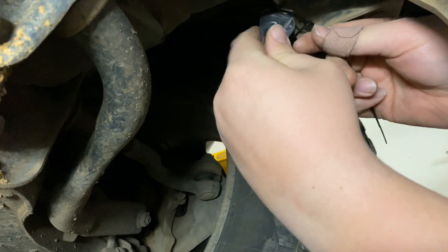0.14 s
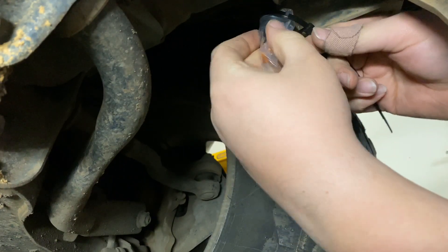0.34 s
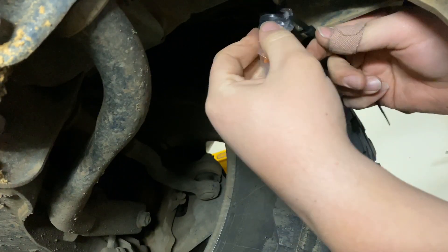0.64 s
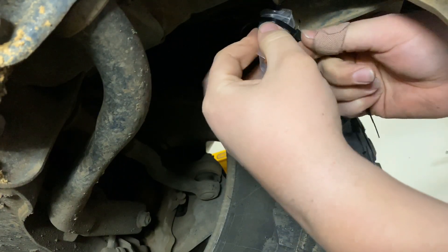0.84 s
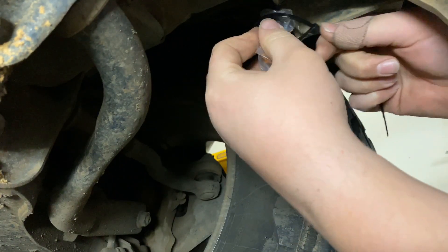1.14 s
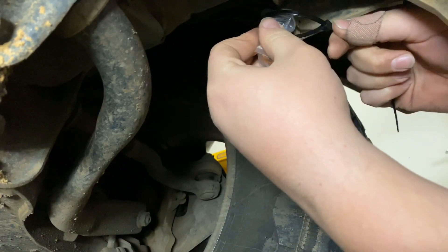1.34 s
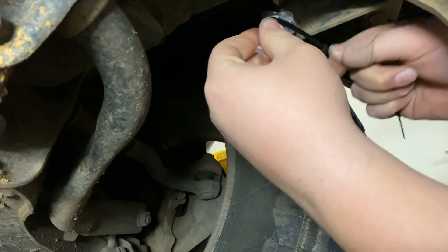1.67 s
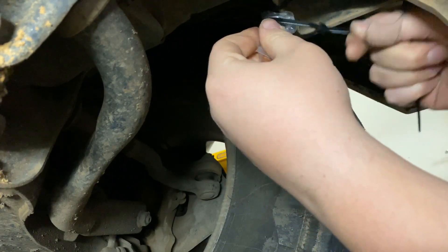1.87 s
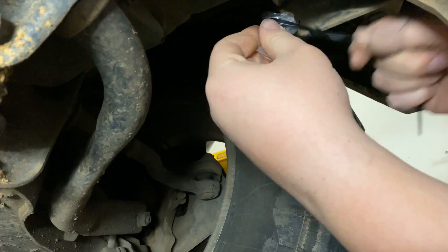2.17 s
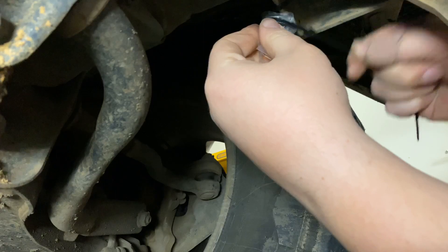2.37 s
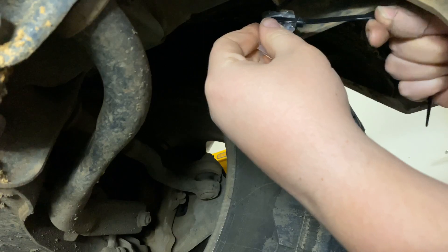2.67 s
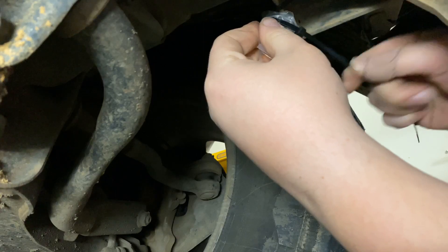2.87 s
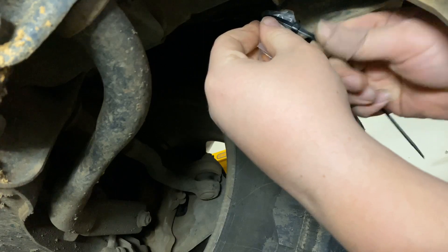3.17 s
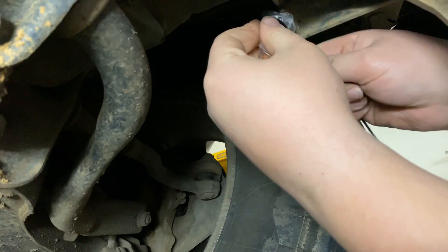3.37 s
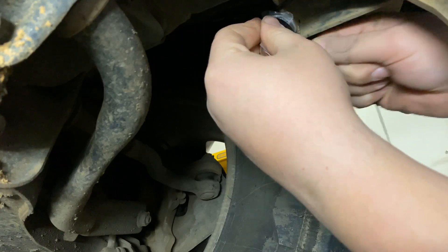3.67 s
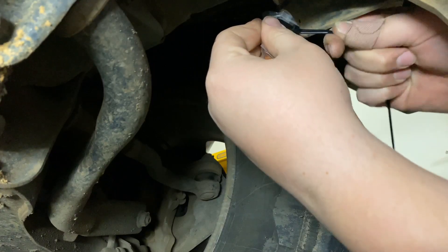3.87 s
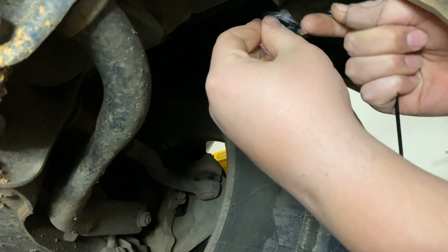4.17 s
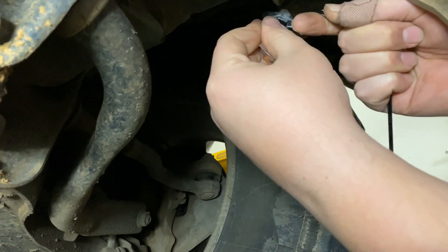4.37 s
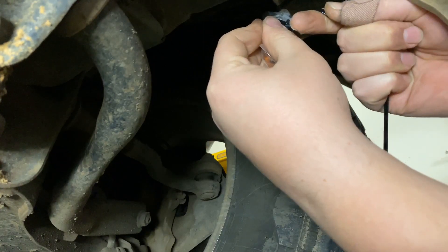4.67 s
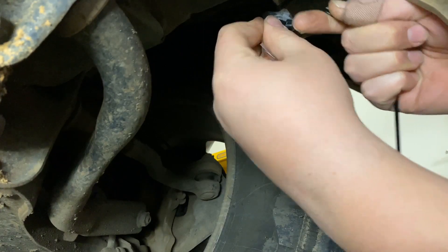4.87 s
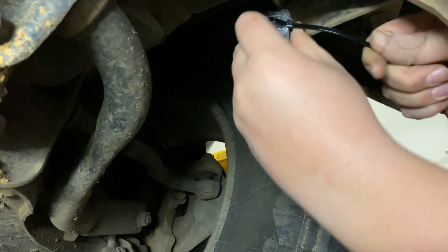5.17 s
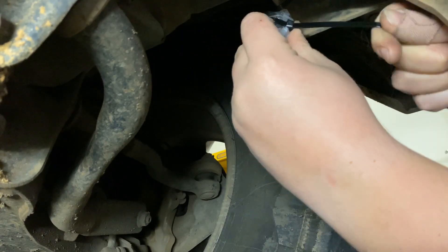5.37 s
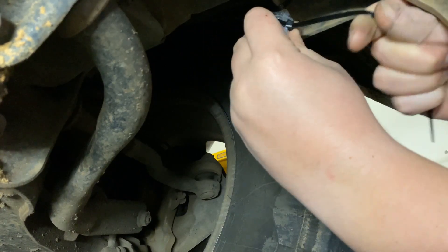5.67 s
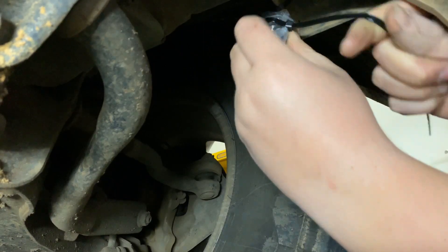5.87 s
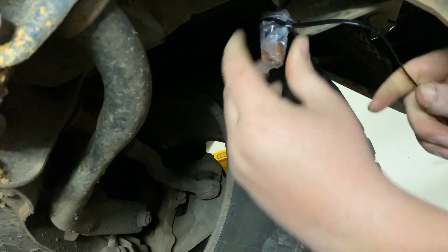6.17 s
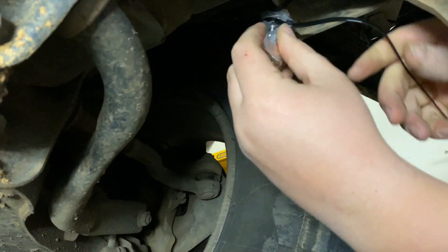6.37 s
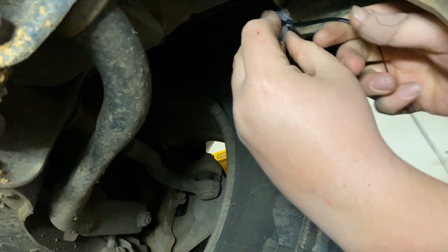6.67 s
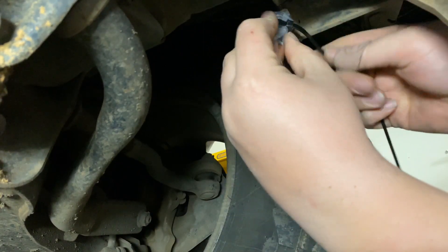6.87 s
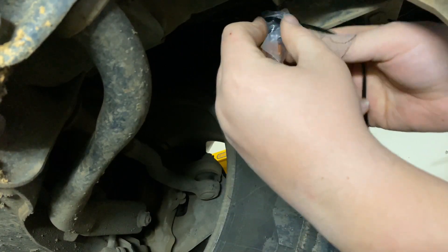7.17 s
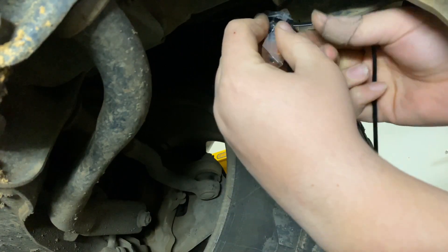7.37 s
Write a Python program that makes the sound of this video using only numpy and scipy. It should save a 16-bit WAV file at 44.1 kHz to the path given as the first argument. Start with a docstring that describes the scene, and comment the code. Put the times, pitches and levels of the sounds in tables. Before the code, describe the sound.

Very close to the microphone, hands rustle and snap a thin plastic bag. Three very short ratchet zips of a nylon tie follow within a second, each leaving a faint metallic ring, then a stronger zip later. Sharp clicks and crinkles continue, with a tiny strap squeak and firmer rustling toward the end. A garage tail, soft air hiss and a low distant engine hum lie underneath.

```python
"""Hands pull a nylon cable tie tight around a plastic bag under a car, close to the microphone.
From the start the bag rustles and snaps: shaped noise for sliding skin, short coloured clicks for the snaps.
Four quick pulls follow, each a run of clicks as the pawl rattles over the teeth; a metal part rings faintly.
Later the strap squeaks briefly in bands of noise, and snaps and strokes go on to the end.
Throughout, echoing noise makes the garage answer, two wavering tones hum as a far engine, and the air hisses."""
import sys
import numpy as np
from scipy import signal
from scipy.fft import rfft, irfft
from scipy.io import wavfile
from scipy.ndimage import uniform_filter1d

SR = 44100
rng = np.random.default_rng(int(sys.argv[2]) if len(sys.argv) > 2 else 0)


def wrap_up_sound(samples):
    """Save the sound to the file named by the first command line argument, as 16-bit audio."""
    columns = np.atleast_2d(samples).T
    # keep every value between -1 and 1, then stretch to whole-number steps
    tamed = np.clip(columns, -1, 1)
    steps = np.round(tamed * 32767).astype(np.int16)
    wavfile.write(sys.argv[1], SR, steps)


N = 331181
TIME = np.arange(N) / SR
BINS = np.fft.rfftfreq(4096, 1 / SR)  # frequencies at which a click is coloured [Hz]

# fingers sliding on bag and strap, levels before the overall rub and fizz settings:
# (start [s], length [s], hardest moment [0-1], rub level [dB], fizz level [dB])
STROKES = [(0, 0.24, 0, -54.5, -57), (.2, 0.39, 0.2, -62, -72.5), (.53, 0.31, 0.15, -60.5, -66.5),
           (1.136, 0.068, 0.35, -49, -49), (1.572, 0.088, 0.9, -75, -60.5), (1.904, 0.12, 0.04, -68, -51),
           (2.318, 0.18, 0.97, -65, -53), (2.744, 0.38, 0.04, -67.5, -66.5),
           (3.16, 0.19, 0.33, -58.5, -60.5), (4.839, .24, 0.42, -49, -56), (5.042, 0.26, 0.16, -66, -65.5),
           (5.612, 0.32, 0.55, -62.5, -62.5), (5.813, 0.21, 0.32, -46, -62.5),
           (6.156, 0.17, 0.13, -54.5, -59), (6.322, 0.14, 0.18, -56, -57.5), (6.469, 0.11, 0.46, -54, -54),
           (6.61, 0.43, 0.13, -54.5, -65), (6.988, .34, 0.78, -50.5, -61), (7.346, 0.078, 0.7, -69, -57.5)]


def pulls(level_db, shake_db):
    """Every tooth flicks the pawl, in most pulls duller as it goes on; the strap rings and shakes the metal."""
    # timing of the quick pulls: (start [s], length [s], pause before the last slip [s], teeth [count],
    # fastest moment [0-1], slowing at the ends [ratio])
    pull_motions = [(1.7495, .0894, .0136, 13, .56, 3), (2.1107, .0689, .0274, 14, .48, 2.8),
                    (2.511, .0326, .0198, 9, .02, .7), (3.6278, .0855, .0198, 11, .4, 1.8)]
    # force of each pull: (level [dB], swell in the middle [dB], fade [dB], shaking of the metal part [dB],
    # share of clean snap in a tooth [0-1], darkening from first to last tooth [dB per octave])
    pull_forces = [(2.5, 0, 4, 4, 0, 3), (1.46, 0.8, -1, 7.5, 0.32, 1.5), (5, 0.5, -1, 6, 0.2, 0),
                   (9.5, 7, 7, -18.5, .05, 3.5)]
    # colour of each pull, which changes as the loop shrinks; one list a pull: (frequency [Hz], level [dB per Hz])
    pull_colours = [
        [(71, -37), (120, -7), (284, -17), (427, -7), (524, -13), (580, -6), (822, -20), (1320, -4),
         (2150, -3.5), (3110, -11), (4410, -10), (4780, -16), (9400, -6), (13900, -4), (16000, -8)],
        [(71, -44), (120, -14), (184, -10), (284, -21), (580, -2), (712, -17), (968, -16), (1320, -9),
         (1830, -9), (2650, -2), (3450, -16), (3740, -11), (5300, -16), (11500, -5), (16000, -13)],
        [(71, -50), (120, -20), (289, -24), (569, -2), (698, -13), (1320, -10), (1430, -13), (2430, -3),
         (3110, -12), (3740, -8), (4500, -13), (6370, -4), (9210, -12), (12000, -4), (16000, -13)],
        [(71, -45), (120, -15), (308, -18), (617, -14), (684, -19), (757, -17), (1320, -3), (1860, -7),
         (2700, -2), (3110, -12), (5190, -6), (5630, -11), (8660, -7), (9990, -17), (16000, -13)],
    ]
    # narrow resonances of the strap and what it grips: (frequency [Hz], width [Hz], lift [dB])
    strap_rings = [(1340, 110, 5), (2370, 200, 1), (2760, 150, 4), (3830, 150, 3), (5060, 150, 3),
                   (8720, 200, 3), (12150, 250, 3)]
    # the ringing metal part: (frequency [Hz], level before shaking [dB], time to fall by 60 dB [s])
    metal_rings = [(614, -64, 1.4), (598, -68, .6), (824, -73, .5), (335, -66, .3)]
    tooth_tilt_db = 0.66  # chance difference in brightness between teeth, per octave

    out, shaking = np.zeros(N), np.zeros(N)
    t = np.arange(2 * SR) / SR
    strap_db = sum(db / (1 + (2 * (BINS - hz) / width) ** 2) for hz, width, db in strap_rings)
    metal = sum(amp(db - 60 * t / t60) * np.sin(2 * np.pi * hz * t) for hz, db, t60 in metal_rings)
    octaves = np.log2(BINS + 500)

    for motion, force, colour in zip(pull_motions, pull_forces, pull_colours):
        *loudness, shake, clean, darkening = force
        run = teeth(*motion, *loudness)
        colour_db = read(colour, BINS) + strap_db
        for (s, db), progress in zip(run, np.linspace(-.5, .5, len(run))):
            tilt = tooth_tilt_db * rng.standard_normal() - darkening * progress
            gain = evened(amp(colour_db + tilt * octaves))
            tooth = click(gain, rattle_s=.0014, clean=clean, arch_db=-9, arch_t60=.052)
            add(out, s, amp(level_db + db) * tooth)
        add(shaking, run[:, 0].mean(), amp(shake_db + shake) * metal)
    return out, shaking


def teeth(start, length, pause, count, fastest, slowing, level_db, swell_db, fade_db):
    """The hand speeds up, then brakes; after a pause one last tooth slips. Gives (s, dB) for each tooth."""
    slip_db = -1.6  # the last slip is weaker
    jitter_s, spread_db = .0002, 0.56  # no two teeth are quite alike
    along = np.linspace(0, 1, round(count))
    gaps = 1 + slowing * (np.linspace(0, 1, len(along) - 1) - fastest) ** 2
    times = start + length * np.r_[0, np.cumsum(gaps)] / gaps.sum()
    db = level_db - swell_db * (2 * along - 1) ** 2 - fade_db * (along - .5)
    times = np.r_[times, times[-1] + pause]
    db = np.r_[db, db[-1] + slip_db]
    chance = rng.standard_normal((len(times), 2)) * [jitter_s, spread_db]
    return np.c_[times, db] + chance


def snaps(level_db, thud_db):
    """Each snap has its own ring, over the knock and body of the bundle and a bright crack."""
    # the clear snaps of pawl, strap and bag, levels before the overall setting:
    # (time [s], ring [Hz], ring level [dB], knock level [dB], body level [dB], crack level [dB])
    snap_events = [(.04, 4990, -2, 1.5, -3, -25), (0.1031, 5470, -4, 0, 1.5, -34),
                   (0.259, 4560, -10.5, -0.5, 3, -46), (.3343, 4910, 1, 10, 2.5, -40),
                   (.384, 4570, -7.5, -27, -9, -16.5), (.443, 4800, -9, -15, -9.5, -21.5),
                   (0.5498, 3820, -7, -3.5, -9, -14), (0.5646, 7300, 1, -14, 6, -24),
                   (.591, 4560, 8.5, -20, 6.5, -21), (.607, 4800, 5, 2, 6, -10),
                   (.6579, 2880, 5, 4.5, -12, -45), (0.811, 5040, -15.5, -14, -17, -32),
                   (1.1673, 6100, 3.5, 0, -1, -24), (1.1754, 3180, 3, -20, -15, -30),
                   (1.3367, 3500, -2, -36, -10, -15), (1.3813, 3480, 7, -8.5, 0, -17),
                   (1.5989, 3480, 0.5, -5, 4, -37), (1.616, 4360, -8, -0.5, 0, -32),
                   (1.974, 5130, 1.5, 5.5, 9.5, -22), (2.0034, 4880, -7, -24, -24, -10.5),
                   (2.097, 6550, -4, -19, -8, -39), (2.3522, 5870, 3.5, 10.5, 13, -11),
                   (2.36, 4910, 4.5, -23, 1, -22), (2.4237, 4840, -12, 0, 4, -40),
                   (2.4496, 6150, -9, -16, -2, -20), (2.479, 2820, 11.5, -10, -11, -7),
                   (2.9247, 4070, -6.5, -17, -6, -34), (3.1115, 5120, -9.5, -27, -17, -45),
                   (3.2448, 4620, 5, 8, 8, -11.5), (3.285, 2770, -7, -4, -20, -38),
                   (3.3196, 5160, -30, -9, -5, -50), (3.3474, 4550, -36, -5, -7, -51),
                   (3.4475, 4330, -10, -6, -6.5, -33), (3.549, 4060, -10, -11, -7.5, -24),
                   (3.5668, 4660, 16, 2, 3, 7.5), (3.8121, 5540, 9, 7, 7, -6),
                   (3.887, 5700, 10, 5, 5, -3.5), (3.9586, 4940, -5, -3.5, -2, -15),
                   (3.9725, 6140, 10, -2, 0, 1.5), (4.1708, 7070, -13.5, -18, -15.5, -29),
                   (4.219, 7060, 8.5, -11.5, 0, -14), (4.7642, 6640, 5.5, -18, -3.5, -27),
                   (4.855, 4260, -22, -14, -2, -49), (4.977, 4540, -9.5, -5, -0.5, -21),
                   (5.3479, 5240, 2, 2.5, 4.5, -9.5), (5.4274, 4290, 9, -4.5, 11.5, -35),
                   (5.5855, 3970, -13.5, -6.5, -14, -46), (5.8373, 4430, -9, 1, -6, -34.5),
                   (6.2178, 4720, 5, -1, 6, -3.5), (6.345, 4700, -20, -8, -10, -34),
                   (6.376, 4700, -5.5, -8, -8, -25), (6.8095, 5430, -10, -7.5, -3, -32),
                   (6.8735, 6280, -3, -19, -7.5, -33), (6.9253, 3880, -9, 0, 0, -24),
                   (6.9492, 4240, 7, -17, -10, -6.5), (7.031, 6360, -6, -7, -7.5, -17),
                   (7.1192, 5800, -3.5, -14, -2, -12), (7.1367, 4420, 6, -4.5, -4, -11),
                   (7.2536, 4490, 8.5, -1.5, 4.5, -16), (7.4382, 5460, 14.5, 10, 15, 0.5)]
    # the crack is duller after the hands change their grip: (time [s], centre [Hz], sharpness Q [ratio])
    crack_grips = [(5.4, 11400, 0.73), (6.1, 9200, 1.2)]
    out = np.zeros(N)
    grip_s, crack_hz, crack_q = np.transpose(crack_grips)
    for s, ring_hz, ring_db, knock_db, body_db, crack_db in snap_events:
        crack = hump(hz=np.interp(s, grip_s, crack_hz), q=np.interp(s, grip_s, crack_q))
        power = (amp(ring_db) * hump(hz=ring_hz, q=1.8)) ** 2
        power += (amp(knock_db) * hump(hz=1400, q=2.2)) ** 2
        power += (amp(body_db) * hump(hz=2500, q=2.2)) ** 2
        power += (amp(crack_db) * crack) ** 2
        power += (amp(knock_db + thud_db) * hump(hz=580, q=2)) ** 2
        snap = click(np.sqrt(power), rattle_s=0.0021, clean=0.15, arch_db=-7.0, arch_t60=0.067)
        add(out, s, amp(level_db) * snap)
    return out


def click(gain, rattle_s, clean, arch_db, arch_t60):
    """A sharp release, its rattle through the plastic and the quick reflections of the wheel arch."""
    t = np.arange(len(BINS)) / SR
    burst = evened(t * np.exp(-t / .00022)) ** 2
    rattle = evened(np.exp(-t / rattle_s)) ** 2
    arch = evened(amp(-60 * t / arch_t60) * (t > .003)) ** 2
    power = clean * burst + (1 - clean) * rattle + amp(arch_db) ** 2 * arch
    # the hands keep moving, so every click meets a new pattern of reflections
    spectrum = levelled(rng.standard_normal(len(t)) * np.sqrt(power), size=221)
    # this phase lets the colouring ring only after the release, never before it
    log_gain = np.log(np.maximum(gain, gain.max() * 1e-4))
    mirrored = np.r_[log_gain, log_gain[-2:0:-1]]
    phase = -signal.hilbert(mirrored).imag[:len(BINS)]
    return irfft(spectrum * np.exp(log_gain + 1j * phase))[:len(t)]


def levelled(x, size):
    """Evens out the broad colour of a short sound, keeps its fine ripple and gives its spectrum."""
    z = rfft(x, 2 * len(BINS) - 2)
    return z / np.sqrt(uniform_filter1d(abs(z) ** 2, size))


def hump(hz, q):
    """Gain of a broad resonance with steep skirts."""
    ratio = (BINS + 1) / hz
    return 1 / (1 + (q * (ratio - 1 / ratio)) ** 2)


def ticks(per_s, over_fizz_db, spread_db):
    """While the fingers slide, small creases give way at random, louder in a stroke with more fizz."""
    low_hz, high_hz = 3630, 7200  # a crease rings somewhere in this range
    out = np.zeros(N)
    chances = rng.random((len(STROKES), 40, 4))
    for (start, length, *_, fizz_db), draws in zip(STROKES, chances):
        for when, size, pitch, body in draws[:round(per_s * length)]:
            ring_hz = low_hz + pitch * (high_hz - low_hz)
            level = amp(fizz_db + over_fizz_db - spread_db * size)
            add(out, start + when * length, level * crease(ring_hz, body))
    return out


def crease(ring_hz, body_share):
    """One small fold gives way: its own ring over the body of the bundle."""
    ring = (1 - body_share) * hump(hz=ring_hz, q=1.5) ** 2
    body = body_share * hump(hz=2100, q=1.3) ** 2
    return click(evened(np.sqrt(ring + body)), rattle_s=.002, clean=.25, arch_db=-7, arch_t60=.06)


def rustle(rub_db, fizz_db, flutter_db, film_db):
    """Skin drags over the film in uneven strokes: a dull rub and a fine crackling fizz."""
    # colour of the dull rub: (frequency [Hz], level [dB per Hz])
    rub_colour = [(100, -24.5), (450, 2.5), (900, 2), (1600, 4.5), (2600, 0), (3300, -7), (4200, -5.5),
                  (6000, -22.5), (16000, -52)]
    # colour of the crackling fizz: (frequency [Hz], level [dB per Hz])
    fizz_colour = [(1500, -30), (3400, -10), (4300, -4), (5500, -12.5), (7300, -3), (10000, -15.5),
                   (13000, -14.5), (16000, -22.5)]
    edge = 0.62  # pressure rises and falls by this power of time
    grains = crinkle(per_s=550, spread_db=4.3, smooth=.7) * amp(flutter_db * drift(per_s=55))
    rub, fizz = coloured(grains, rub_colour), coloured(grains, fizz_colour)
    out = np.zeros(N)
    for start, length, hardest, rubbing, fizzing in STROKES:
        span = slice(round(start * SR), round((start + length) * SR))
        sound = amp(rubbing + rub_db) * evened(rub[span])
        sound = sound + amp(fizzing + fizz_db) * evened(fizz[span])
        # each grip folds the film differently, so each stroke rings in its own way
        film = click(np.ones(len(BINS)), rattle_s=.0022, clean=.3, arch_db=-10, arch_t60=.05)
        peak = np.clip(hardest, .01, .99)
        pressure = np.interp(np.linspace(0, 1, len(sound)), [0, peak, 1], [0, 1, 0])
        sound = sound * pressure ** edge
        add(out, start, sound)
        add(out, start, amp(film_db) * signal.fftconvolve(sound, film))
    return out


def crinkle(per_s, spread_db, smooth):
    """Tiny crease pops of uneven size in smooth friction noise."""
    sizes = amp(spread_db * np.minimum(rng.exponential(1, N), 4))
    pops = sizes * (rng.random(N) < per_s / SR)
    return evened(pops * rng.choice([-1, 1], N)) + smooth * rng.standard_normal(N)


def squeak(start, end):
    """A short slip of the strap between the fingers sings in blurred bands."""
    # bands of the squeak: (frequency [Hz], width [Hz], level at the peak [dB])
    squeak_bands = [(1900, 160, -56), (2950, 300, -56), (5800, 350, -58)]
    hz = np.fft.rfftfreq(N, 1 / SR)
    slips = rfft(rng.standard_normal(N))
    voice = np.zeros(N)
    for centre, width, db in squeak_bands:
        band = irfft(slips / (1 + (2 * (hz - centre) / width) ** 2), N)
        voice += amp(db) * evened(band)
    return voice * np.interp(TIME, [start, (start + end) / 2, end], [0, 1, 0])


def engine(level_db, waver_db, roar_db):
    """The two lowest firing harmonics and a muffled roar carry into the garage from far away."""
    # distant engine, before waver and overall level:
    # (time [s], firing rate [Hz], fundamental level [dB], octave level [dB])
    engine_course = [(0, 96.5, -61.5, -75), (4.899, 96.2, -58, -58.5), (5.2, 86.7, -67, -57.5),
                     (5.369, 80.5, -50.5, -51.5), (5.65, 79, -47.5, -53), (6.2, 80.7, -52, -45.5),
                     (6.42, 80.4, -52, -51.5), (6.58, 82, -40, -44), (6.89, 82.9, -52.5, -38.5),
                     (7.24, 83.05, -51, -45), (7.44, 82.6, -40.5, -52)]
    s, hz, *levels = np.transpose(engine_course)
    rate = np.interp(TIME, s, hz) * (1 + 0.0036 * drift(per_s=6.8))
    turns = np.cumsum(rate) / SR
    gains = [amp(level_db + np.interp(TIME, s, db) + waver_db * drift(per_s=9)) for db in levels]
    tones = [gain * np.sin(2 * np.pi * (k + 1) * turns) for k, gain in enumerate(gains)]
    hum = np.sqrt(2) * sum(tones)
    # colour of the roar: (frequency [Hz], level [dB per Hz])
    roar_colour = [(60, -15.5), (200, -12.5), (290, -2.5), (400, -13), (1500, -35.0)]
    roar = coloured(rng.standard_normal(N), roar_colour)
    return hum + amp(roar_db) * sum(gains) * roar


def air(level_db):
    """Steady rumble and hiss of the garage, as noise of a fixed colour."""
    # colour of the air: (frequency [Hz], level [dB per Hz])
    air_colour = [(18, -31.5), (28, -9.5), (42, 2), (70, 5), (100, 1), (140, 0.5), (200, -6), (350, -10.5),
                  (600, -14), (1100, -25), (2300, -24.5), (3200, -30), (7000, -32.5), (10000, -42.5),
                  (16000, -44.5)]
    return amp(level_db) * coloured(rng.standard_normal(N), air_colour)


def garage(x, wet_db):
    """Adds the long faint tail of the room, in which treble mostly dies faster than bass."""
    # how long the room rings: (frequency [Hz], time to fall by 60 dB [s])
    room_decay = [(150, 1.4), (600, 1.1), (2000, 0.63), (6000, 0.51), (10000, 0.27), (16000, 0.39)]
    hz, frame_s, z = signal.stft(rng.standard_normal(SR), SR, nperseg=256)
    fading = amp(-60 * frame_s / read(room_decay, hz)[:, None])
    tail = signal.istft(z * fading, SR, nperseg=256)[1][:SR]
    tail *= TIME[:SR] > .008  # the room answers only after 8 ms
    return x + amp(wet_db) * signal.fftconvolve(x, tail / np.linalg.norm(tail))[:N]


def amp(db):
    """Turns decibels into a plain factor."""
    return 10 ** (np.asarray(db) / 20)


def evened(x):
    """Scales to rms 1."""
    return x / np.sqrt(np.mean(x ** 2) + 1e-20)


def read(points, hz):
    """Reads a table on a log-frequency axis."""
    f, value = np.transpose(points)
    return np.interp(np.log(hz + 1), np.log(f + 1), value)


def add(mix, s, sound):
    """Adds a sound to the mix at time s."""
    part = mix[max(round(s * SR), 0):][:len(sound)]
    part += sound[:len(part)]


def coloured(x, spectrum):
    """Filters a long signal by a colour table, to rms 1."""
    return evened(irfft(rfft(x) * amp(read(spectrum, np.fft.rfftfreq(N, 1 / SR))), N))


def drift(per_s):
    """Slow random wandering, rms 1."""
    slow = np.fft.rfftfreq(N, 1 / SR) < per_s
    return evened(irfft(rfft(rng.standard_normal(N)) * slow, N))


def scene():
    """The work of the hands in the room, over the ringing metal, the engine and the air."""
    ratchet, metal = pulls(level_db=1.5, shake_db=12.5)
    clicks = snaps(level_db=-1.0, thud_db=-10.0) + ticks(per_s=25, over_fizz_db=38.5, spread_db=17)
    hands = rustle(rub_db=0.0, fizz_db=2.5, flutter_db=-1.2, film_db=-9.5) + squeak(start=5.615, end=5.72)
    close = garage(ratchet + clicks + hands, wet_db=-20.0)
    far = engine(level_db=-0.5, waver_db=1.55, roar_db=-20.0) + air(level_db=-52)
    return (close + metal + far)[None]


def record(dry):
    """Rounds the highest peaks and leaves no treble above edge_hz."""
    edge_hz = 16050
    rounded = np.tanh(dry)
    lowpass = signal.firwin(255, edge_hz, window=("kaiser", 8), fs=SR)
    return signal.oaconvolve(rounded, lowpass[None], "same")


dry = scene()
out = record(dry)
wrap_up_sound(out)
```